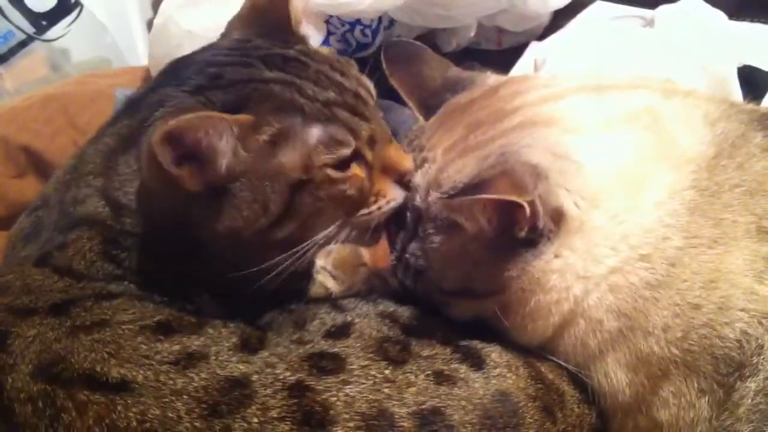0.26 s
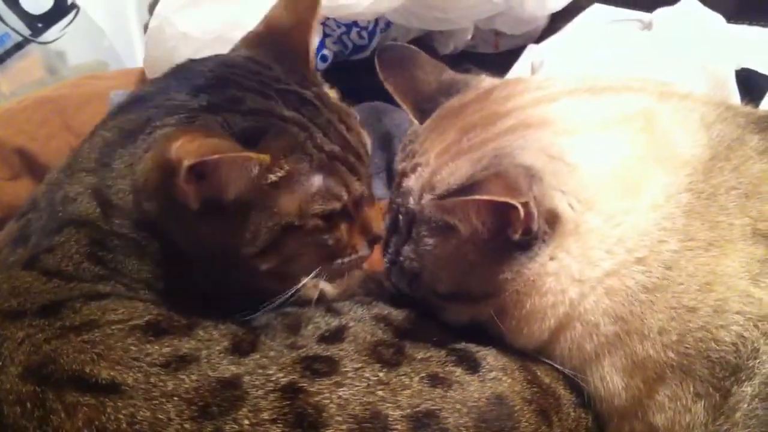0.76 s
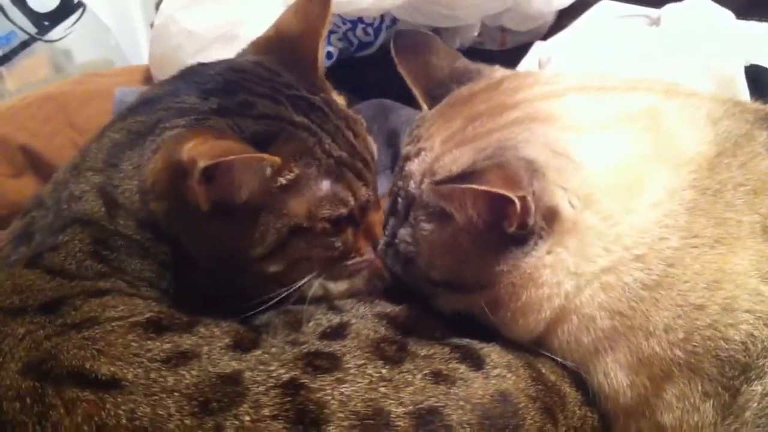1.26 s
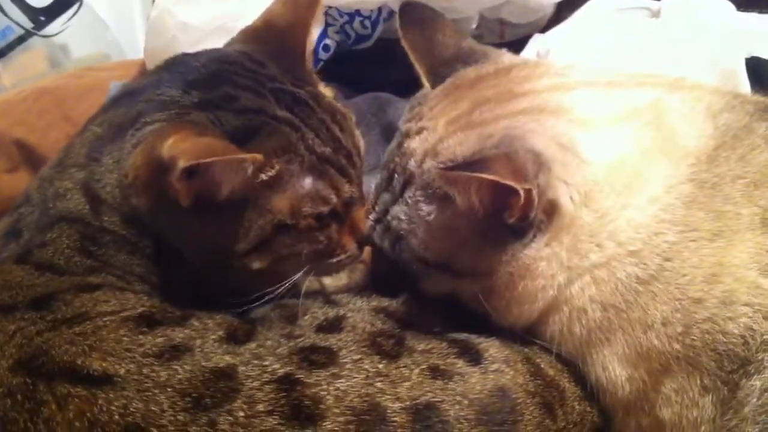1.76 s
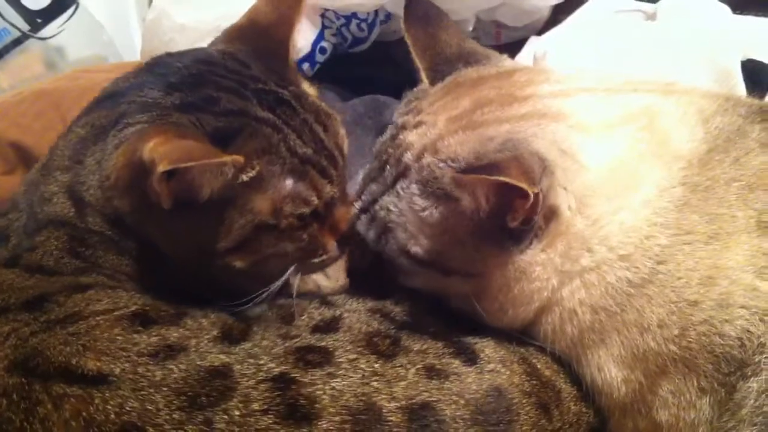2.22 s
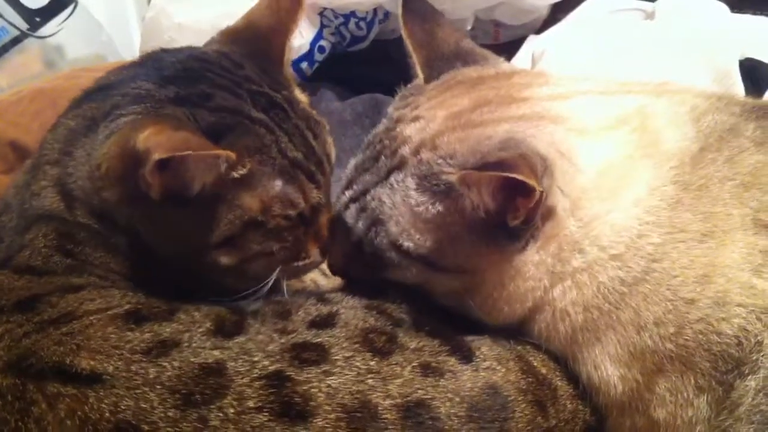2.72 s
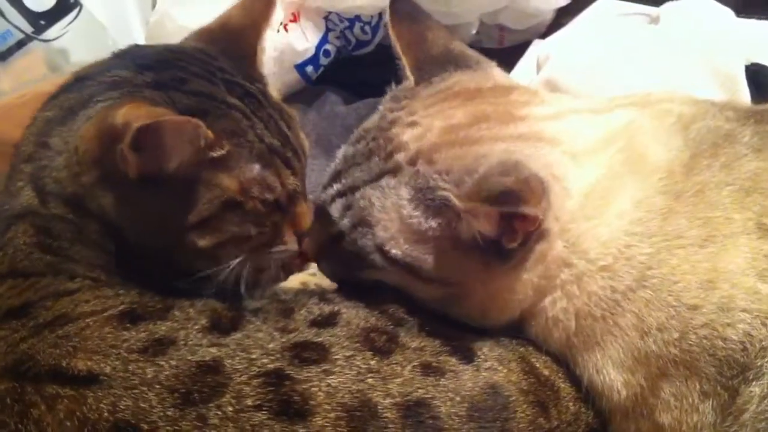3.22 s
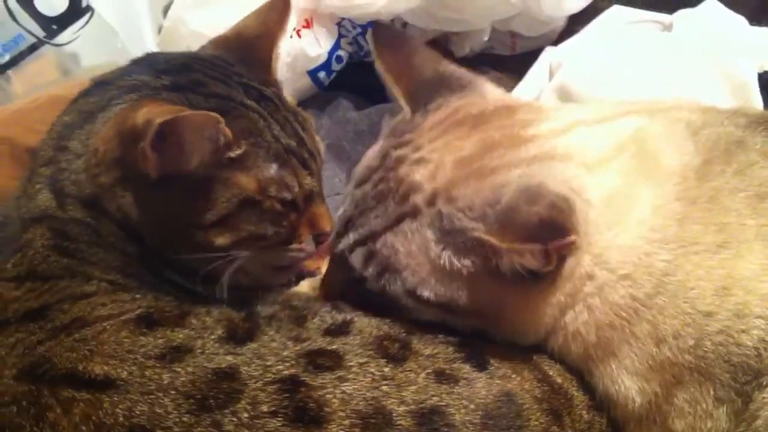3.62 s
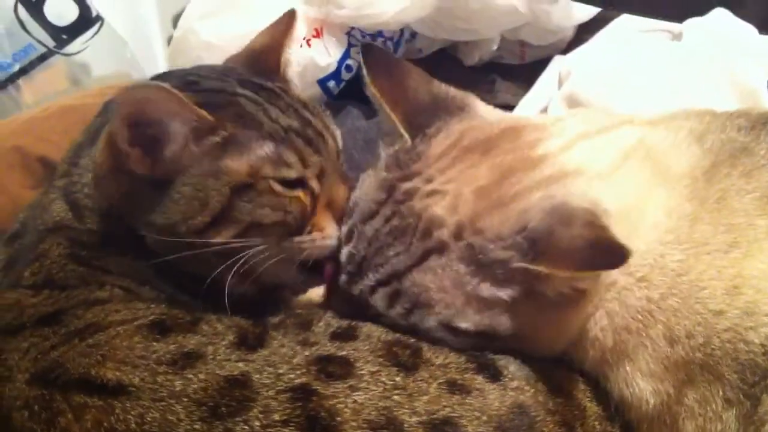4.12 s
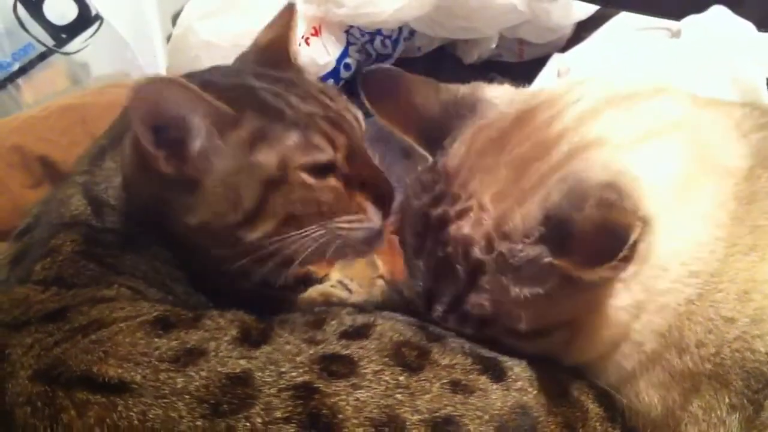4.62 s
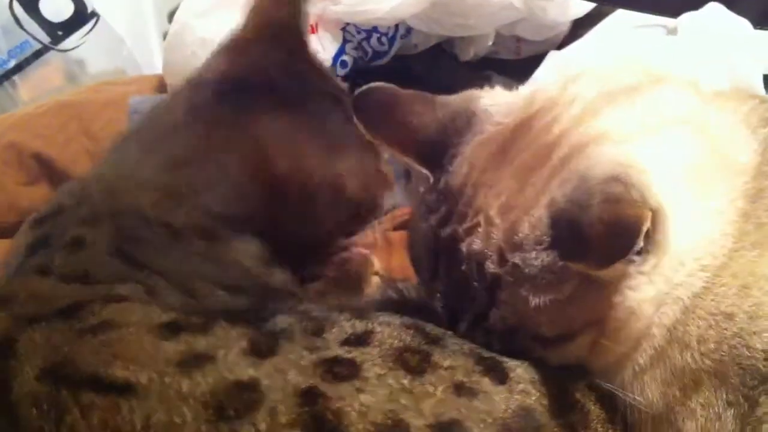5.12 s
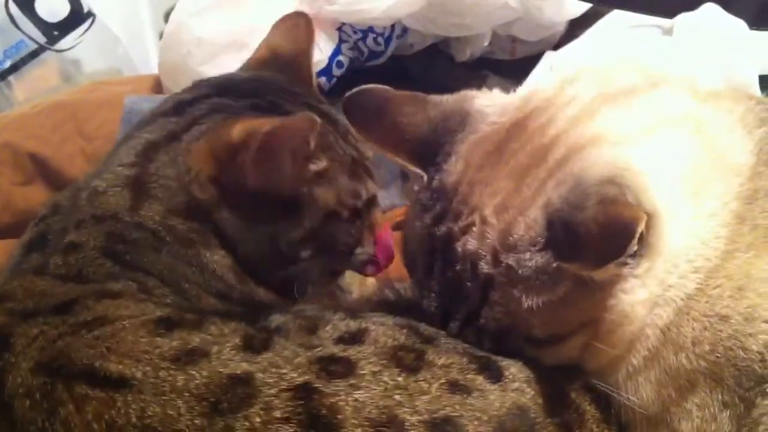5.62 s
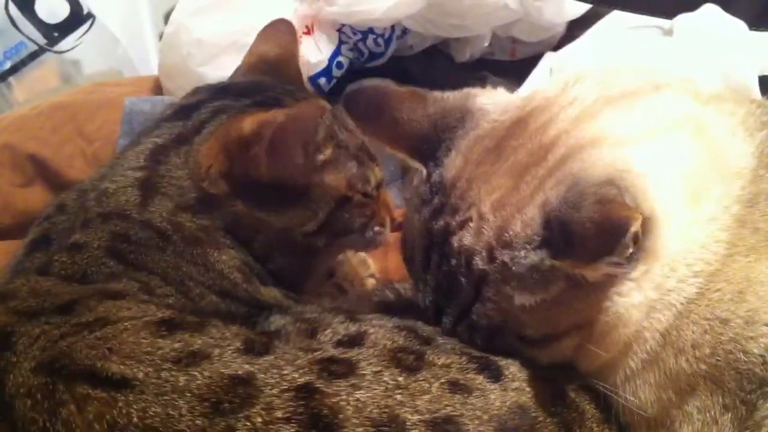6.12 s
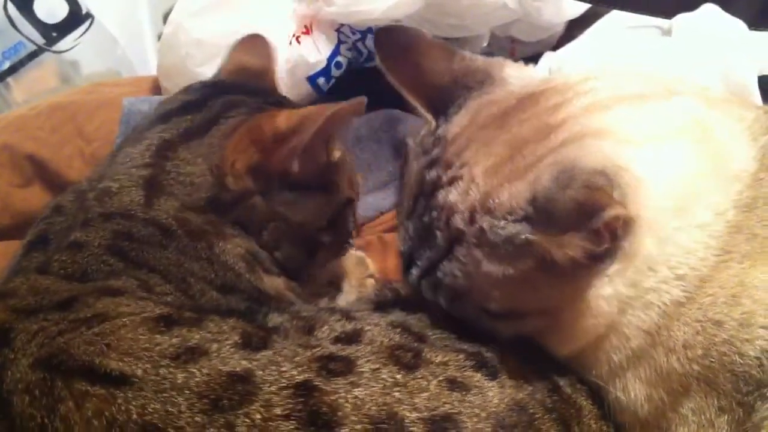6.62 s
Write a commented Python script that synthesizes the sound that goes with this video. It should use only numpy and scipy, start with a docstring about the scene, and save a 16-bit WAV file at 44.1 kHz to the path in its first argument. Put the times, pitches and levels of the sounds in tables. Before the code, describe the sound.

Short, rough, high squeaks like a small bird come in scattered bursts across a room, over a faint motor hum and hiss.

```python
"""Two cats groom each other on a bed without a sound. From start to end a small motor hums over the hiss
of the room and the microphone. Right at the start something across the room squeaks like a small caged
bird: short, rough whistles that slide and jump in pitch, heard mostly through the room's echo.
The loudest squeaks come between 1.2 and 1.8 s, and a very faint one at 2.6 s. After a pause another
run begins at 5.2 s, and two weak squeaks come just before the end."""
import sys
import numpy as np
from scipy import signal
from scipy.fft import rfft, irfft
from scipy.io import wavfile
from scipy.ndimage import uniform_filter1d

SR = 44100
rng = np.random.default_rng(int(sys.argv[2]) if len(sys.argv) > 2 else 0)


def output_pcm(signal):
    """Save a mono or channel-first signal as 16-bit PCM at the path in sys.argv[1].

    Samples are clipped to [-1, 1] before scaling.
    """
    pcm = np.clip(np.atleast_2d(signal).T, -1, 1) * 32767
    wavfile.write(sys.argv[1], SR, np.round(pcm).astype(np.int16))


N = 302967
LEAD = SR // 10  # extra samples before time zero, so that earlier squeaks can still echo


def undb(db):
    """Turn decibels into a number to multiply a sound by."""
    return 10 ** (np.asarray(db) / 20)


def unit(x):
    """Scale a sound so that its average strength (rms) is 1."""
    return x / np.sqrt(np.mean(x ** 2))


def wander(rate_hz):
    """A smooth random curve that turns about rate_hz times a second and strays by about 1."""
    width = max(int(SR / rate_hz), 1)
    noise = rng.standard_normal(N + 4 * width)
    smooth = uniform_filter1d(uniform_filter1d(noise, width), width)
    return smooth[2 * width:2 * width + N] * np.sqrt(1.5 * width)


def hiss():
    """The air in the room and the microphone make an even noise that swells a little."""
    # How strong the hiss is from low to high: frequency_hz, relative_level_db
    hiss_shape = [(20, -25.5), (45, -27), (100, -19), (140, -12.5), (210, -2), (280, -4.5), (400, -5),
                  (480, -11), (1000, -9.5), (1300, -12), (1700, -10.5), (3400, -21.5), (10500, -28),
                  (12500, -28.5), (15700, -26)]
    points_hz, points_db = np.array(hiss_shape).T
    hz = np.maximum(np.fft.rfftfreq(N, 1 / SR), 1)
    shape_db = np.interp(np.log(hz), np.log(points_hz), points_db)
    noise = irfft(rfft(rng.standard_normal(N)) * undb(shape_db), N)
    return unit(noise) * undb(-62 + 1.1 * wander(1.37))


def motor_and_mains():
    """A small motor's overtones follow its drifting speed, beside faint mains hum. Each tone wavers."""
    # The tones of the motor: multiple_of_pitch, level_db
    motor_tones = [(1, -80), (2, -57), (3, -62.5), (4, -66.5), (5, -73), (6, -81), (7, -83), (9, -83)]
    # Faint steady tones, mains hum and a few other thin ones: pitch_hz, level_db
    steady_tones = [(73, -95.5), (120, -83), (193.5, -85), (359.8, -78), (368.8, -76.5), (387.0, -85.5),
                    (580, -85.5), (719, -86.5), (1180, -85.5)]
    pitch_hz = 110.57 * (1 + 0.000638 * wander(0.9))
    phase = 2 * np.pi * np.cumsum(pitch_hz) / SR
    t = np.arange(N) / SR
    hum = np.zeros(N)
    for multiple, db in motor_tones:
        hum += undb(db + 0.88 * wander(2.45)) * np.sin(multiple * phase + rng.uniform(0, 2 * np.pi))
    for hz, db in steady_tones:
        hum += undb(db + 0.64 * wander(1.2)) * np.sin(2 * np.pi * hz * t + rng.uniform(0, 2 * np.pi))
    return np.sqrt(2) * hum


def squeaks():
    """Sliding whistles with escaping air. The wider the slide, the more pitch and loudness shake."""
    # One whistle a row: start_s, length_s, start_pitch_hz, end_pitch_hz, level_db, overtone_boost_db
    whistles = [ (-0.030, 0.048, 6230, 6190, -56.5, -2), (-0.030, 0.049, 4610, 3420, -52, 2),
                (0.02, .040, 2730, 3190, -52.5, -8), (0.042, 0.044, 3404, 3990, -44.5, -3),
                (0.083, 0.024, 4290, 4280, -40.5, -3.5), (0.097, 0.031, 3970, 3540, -48.5, -3),
                (1.174, .014, 2010, 2105, -59, 3.5), (1.186, .038, 2163, 2820, -42, -2),
                (1.192, 0.037, 4390, 5500, -42.5, 10), (1.207, 0.023, 3494, 3824, -33, 9),
                (1.226, 0.026, 5720, 5950, -36, 6), (1.296, 0.039, 3423, 3545, -44, -5),
                (1.333, 0.019, 2580, 2600, -50, -5), (1.348, 0.023, 3440, 3637, -43.5, 0),
                (1.363, .046, 2395, 2655, -58, 1.5), (1.683, 0.025, 1804, 2500, -50, 7.5),
                (1.704, .034, 4150, 4795, -29, 0), (1.71, 0.012, 5200, 5440, -25, -7),
                (1.721, .044, 6020, 6244, -26.5, -5), (2.637, 0.044, 1159, 1165, -64.5, -5),
                (5.170, 0.055, 4450, 3650, -53, 4), (5.172, 0.054, 6360, 6320, -53, -1),
                (5.220, 0.039, 3618, 3420, -40, 0), (5.236, 0.068, 1730, 2500, -61, -9),
                (5.303, 0.078, 3050, 2928, -49.5, -6.5), (5.343, 0.048, 2170, 1900, -59.5, -8),
                (5.420, .085, 2540, 2680, -53, 3), (5.463, 0.074, 3780, 3480, -44, -7),
                (5.509, 0.09, 3230, 3160, -52, 3.5), (5.55, 0.061, 3790, 3983, -43.5, 2),
                (5.571, 0.097, 6280, 5920, -62.5, 4), (5.573, 0.024, 4320, 4480, -50.5, 0),
                (6.791, 0.048, 3586, 3190, -62, 8), (6.83, 0.023, 3250, 3160, -53.5, 3), ]
    # Low notes buzz, high ones are nearly pure. Overtone levels, compared with the lowest tone:
    # pitch_hz, second_db, third_db, fourth_db
    overtones = [(2520, -1, -4, -14), (3300, -17, -25, -23), (3900, -18.5, -16, -28), (4600, -17, -25, -30),
                 (6040, -11.5, -29, -26)]
    pitches_hz, *overtone_columns = np.array(overtones).T
    shake, flutter = wander(487), wander(580)
    air_band = signal.butter(2, [1870, 9000], "band", fs=SR, output="sos")
    air = unit(signal.sosfilt(air_band, rng.standard_normal(N)))
    pitch_shake = 0.0893 * shake + 0.084 * wander(2500)  # a slower and a quicker tremble
    flutter_db, air_db = 7.5, -21.5  # at full roughness
    out = np.zeros(LEAD + N)
    for start_s, length_s, start_hz, end_hz, level_db, boost_db in whistles:
        span = np.arange(int(start_s * SR), min(int((start_s + length_s) * SR), N))
        progress = np.linspace(0, 1, len(span))
        slide_octaves = abs(np.log2(end_hz / start_hz))
        rough = min(0.15 + 1.2 * slide_octaves, 1)  # 0 is clean, 1 is fully rough
        hz = (start_hz + (end_hz - start_hz) * progress) * (1 + rough * pitch_shake[span])
        phase = 2 * np.pi * np.cumsum(hz) / SR
        middle_hz = (start_hz + end_hz) / 2
        second, third, fourth = (np.interp(middle_hz, pitches_hz, column) + boost_db
                                 for column in overtone_columns)
        tone = rough * undb(air_db) * air[span]
        for multiple, db in enumerate([0, second, third, fourth, fourth - 7, fourth - 7], 1):
            in_range = multiple * hz < .45 * SR  # skip what is too high for the sample rate
            tone += undb(db) * np.sin(multiple * phase) * in_range
        swell = progress ** 0.29 * (1 - progress) ** 0.22  # rounds off the start and the end
        gain = undb(level_db + flutter_db * rough * flutter[span])
        out[LEAD + span] += gain * swell / swell.max() * np.sqrt(2) * tone
    return out


def room(sound):
    """A weak direct sound, quick echoes off near surfaces, then a longer one; soft furnishings dull it."""
    room_fade_s, near_fade_s = .34, .12  # time each echo takes to fall by 60 dB
    near_db, direct_db, dull_hz = -2, -13, 12900
    t = np.arange(SR // 2) / SR
    fade = undb(-60 * t / room_fade_s) + undb(near_db - 60 * t / near_fade_s)
    build_up = 1 - np.exp(-t / 0.0016)
    echo = unit(rng.standard_normal(len(t)) * fade * build_up) / np.sqrt(len(t))
    heard = undb(direct_db) * sound + signal.fftconvolve(sound, echo)[:len(sound)]
    return signal.sosfilt(signal.butter(3, dull_hz, fs=SR, output="sos"), heard)[LEAD:]


def scene():
    """Echoing squeaks over the hum and the hiss, in one channel."""
    return (room(squeaks()) + motor_and_mains() + hiss())[None]


def record(dry):
    """The very highest treble is cut off sharply."""
    top_hz = 15630
    return signal.sosfilt(signal.ellip(10, .2, 60, top_hz, fs=SR, output="sos"), dry)


dry = scene()
out = record(dry)
output_pcm(out)
```